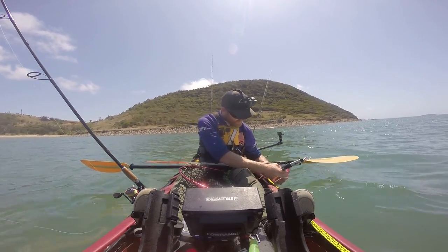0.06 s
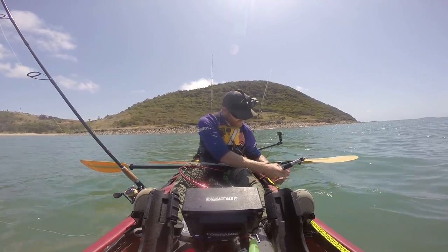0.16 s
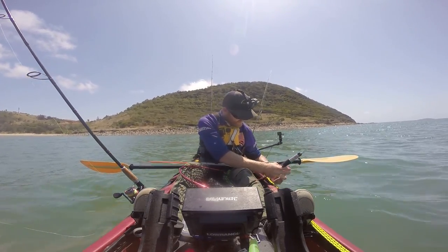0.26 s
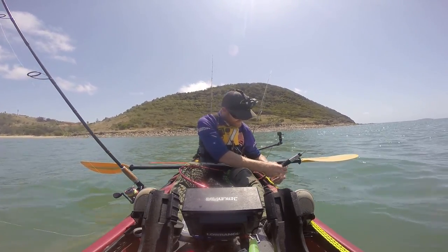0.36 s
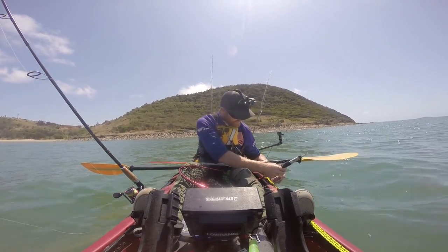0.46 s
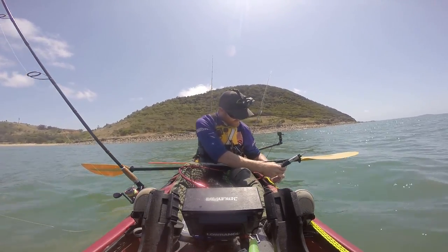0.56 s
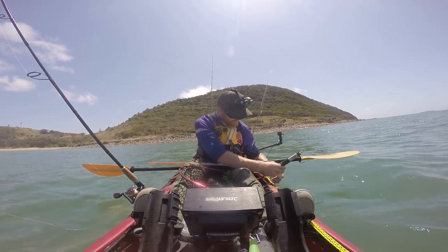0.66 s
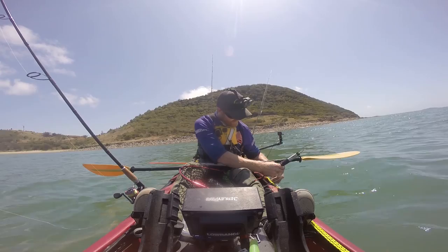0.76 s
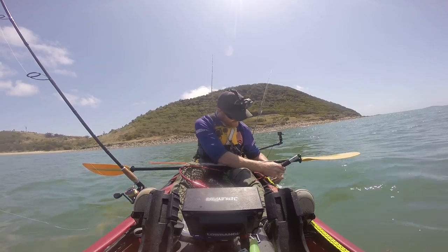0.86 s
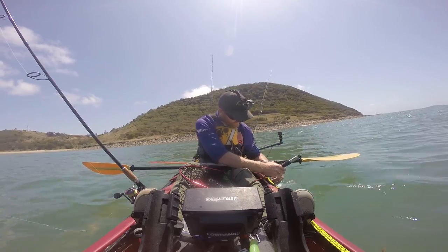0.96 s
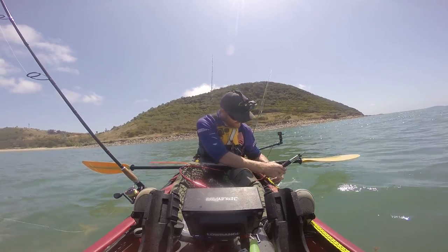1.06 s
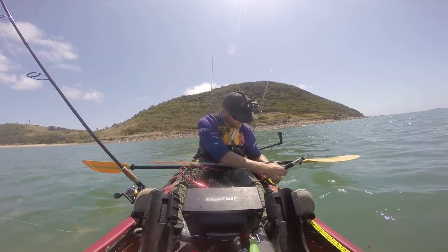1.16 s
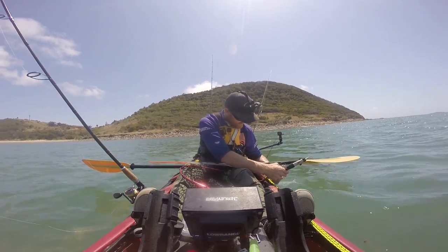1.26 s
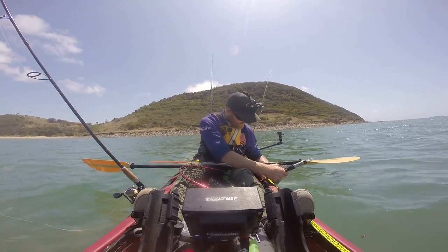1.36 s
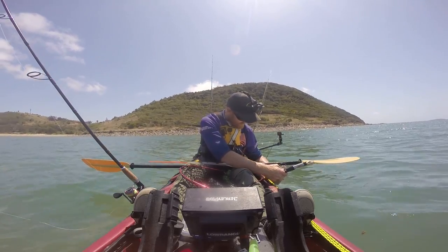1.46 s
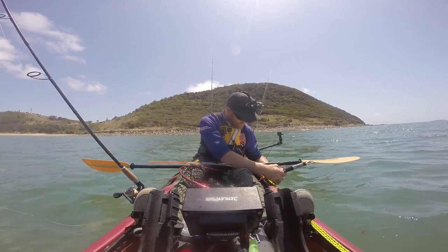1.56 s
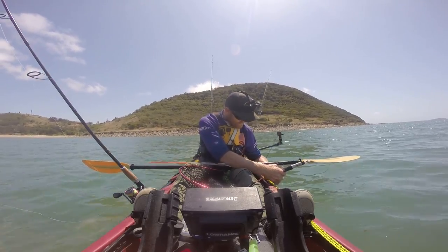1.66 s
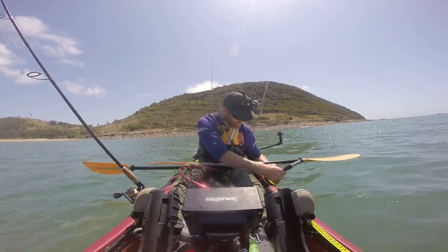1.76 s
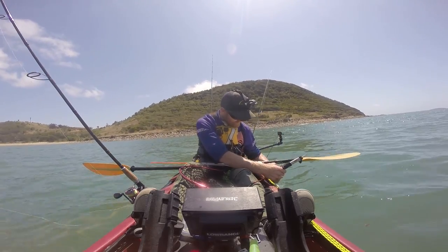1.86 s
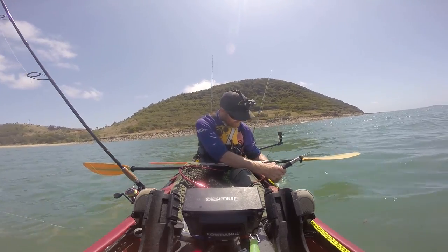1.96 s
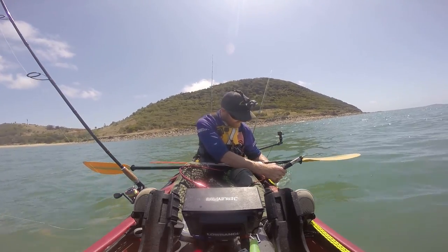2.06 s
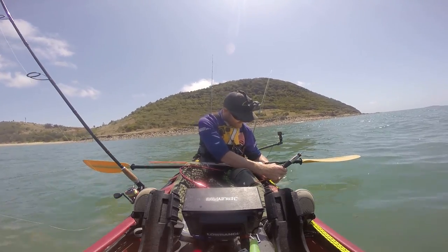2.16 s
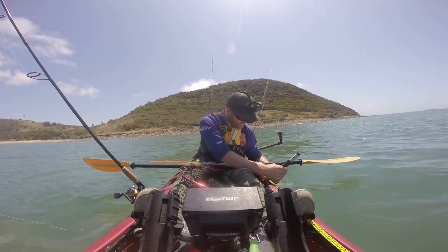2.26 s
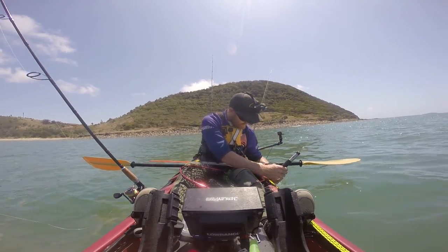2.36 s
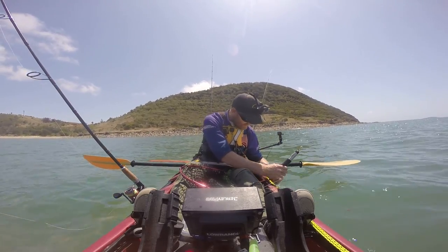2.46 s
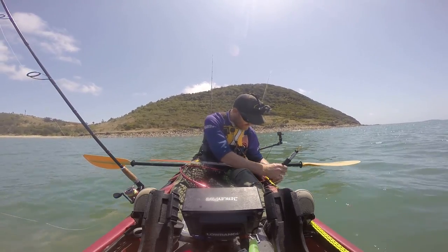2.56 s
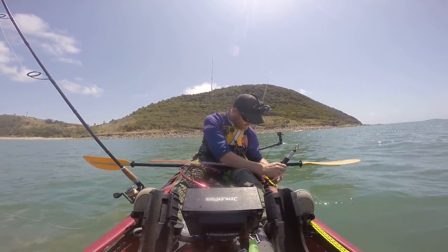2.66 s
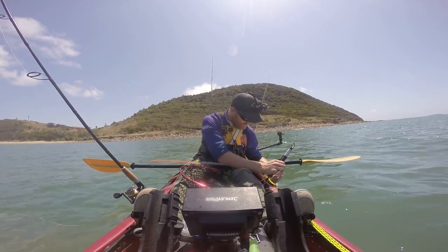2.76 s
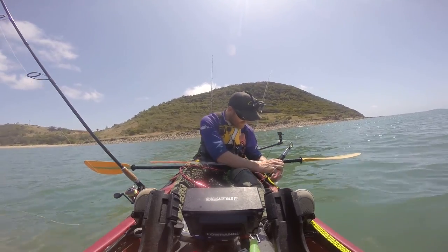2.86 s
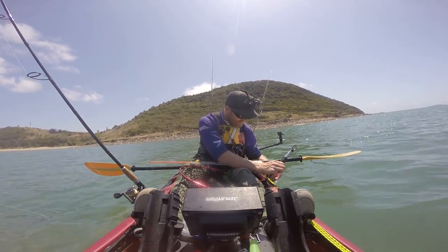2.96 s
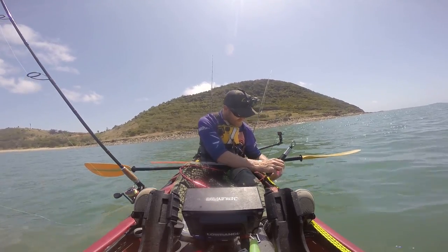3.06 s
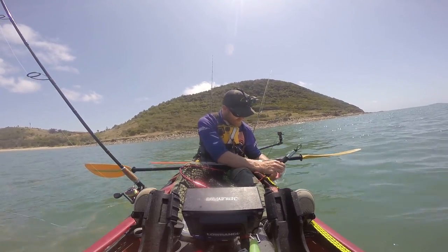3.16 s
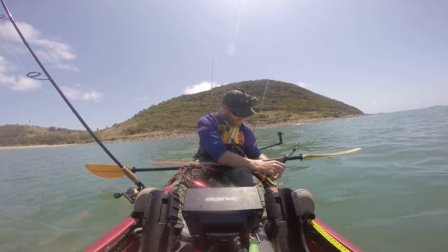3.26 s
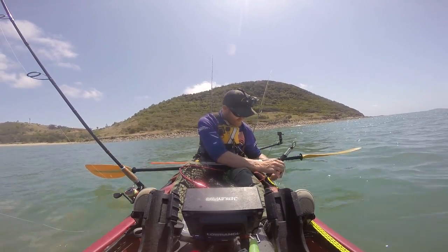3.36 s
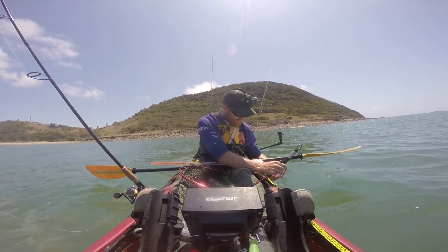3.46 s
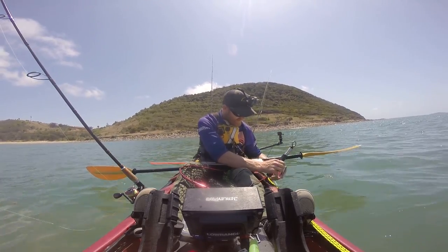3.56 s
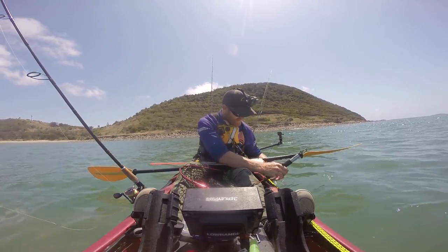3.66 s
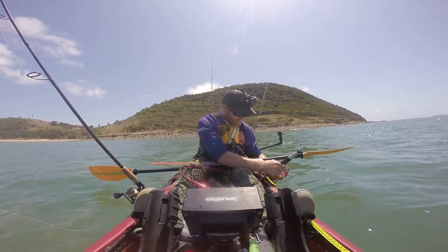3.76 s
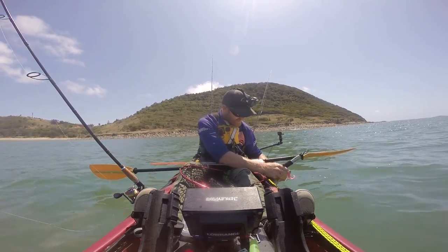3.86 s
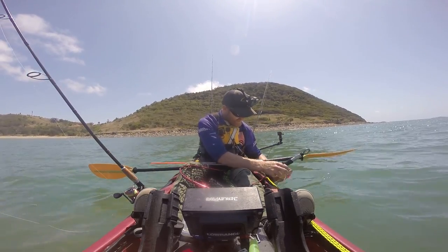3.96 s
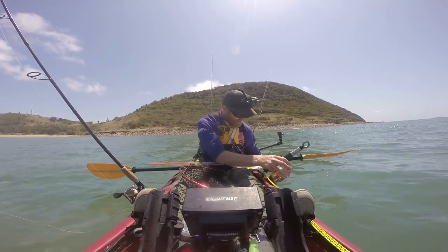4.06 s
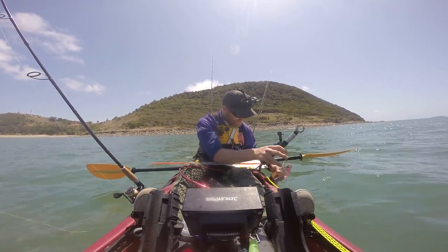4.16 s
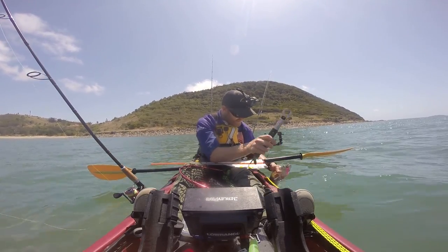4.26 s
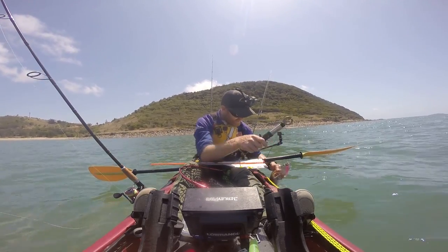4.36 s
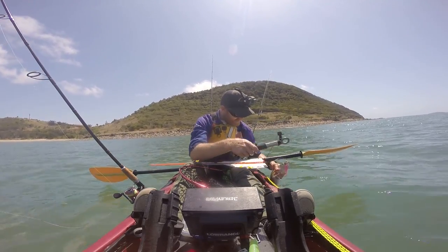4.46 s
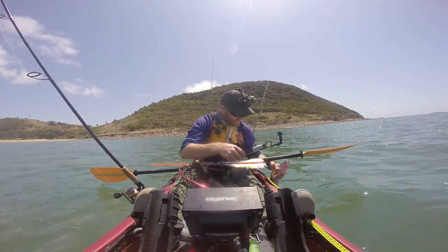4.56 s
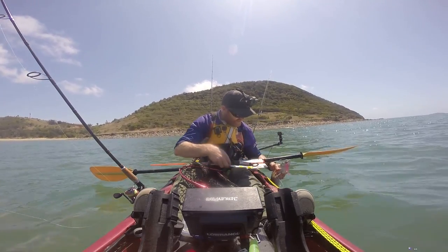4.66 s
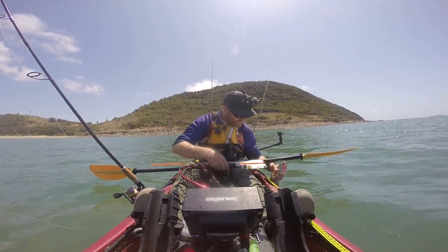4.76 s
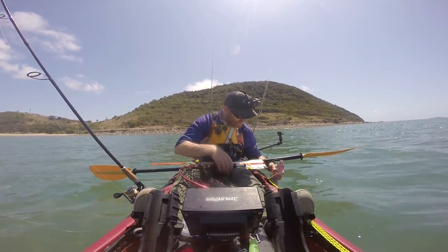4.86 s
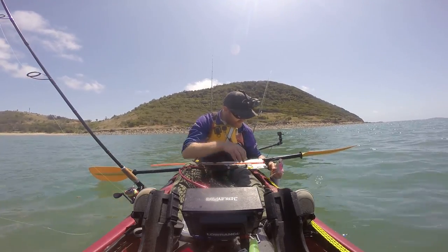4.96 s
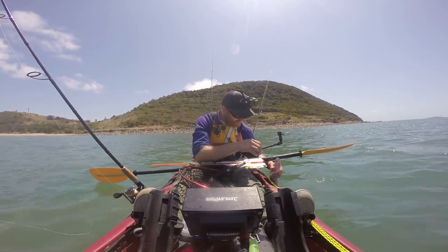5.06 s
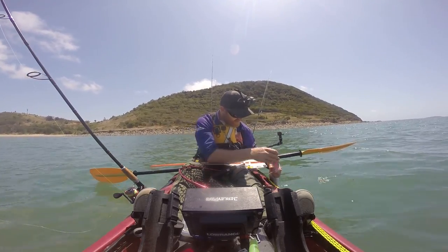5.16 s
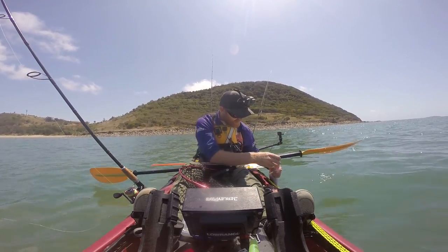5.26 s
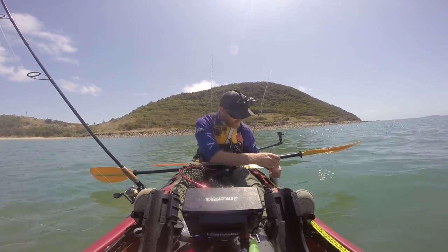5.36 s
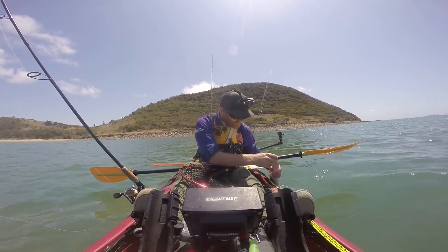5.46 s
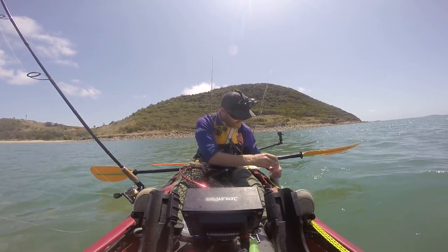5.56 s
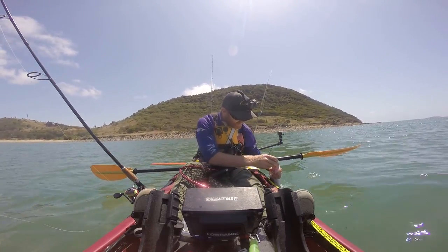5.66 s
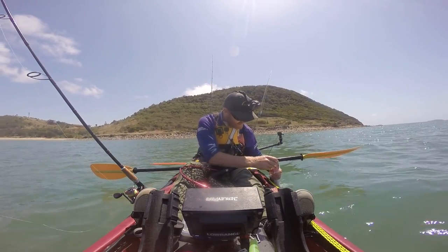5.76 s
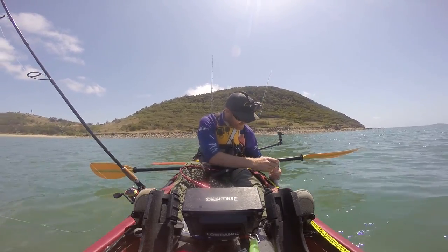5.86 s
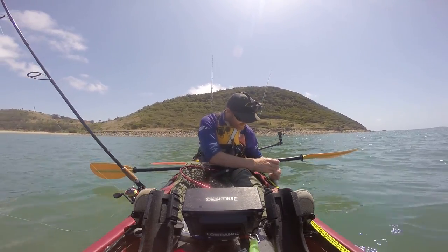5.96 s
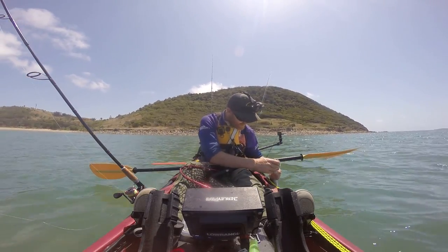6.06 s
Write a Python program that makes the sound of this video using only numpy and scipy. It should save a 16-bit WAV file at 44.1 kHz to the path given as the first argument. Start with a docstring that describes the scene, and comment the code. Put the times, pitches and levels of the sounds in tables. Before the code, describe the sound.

Low water rumble against a drifting hollow kayak, with a hard clunk, a brief reel zip, a short scrape, then boomy knocks and a sharp plastic snap.

```python
"""Water rumbles against a drifting kayak over a camera's faint hiss; drips soon follow, made of short decaying tones.
The camera sits in a sealed case fixed to the deck, so fishing tackle is heard mostly through the plastic hull.
A clunk, a quick reel zip, dull knocks, a short scrape, a sharp snap and a soft rub are built from damped vibrations.
Shaped noise makes the water and hiss; tiny irregular ticks make short patches of faint treble sizzle."""
import sys
import numpy as np
from scipy import signal
from scipy.fft import rfft, irfft, next_fast_len
from scipy.io import wavfile

SR = 44100
rng = np.random.default_rng(int(sys.argv[2]) if len(sys.argv) > 2 else 0)


def put_to_file(sound):
    """Save the sound as 16-bit audio at rate SR, in the file named by the first command-line argument."""
    columns = np.atleast_2d(sound).T  # one column per channel
    safe = np.clip(columns, -1, 1)
    whole_steps = np.round(safe * 32767)
    wavfile.write(sys.argv[1], SR, whole_steps.astype(np.int16))


N = 269451
T = np.arange(N) / SR  # time of every sample [s]
MS_PER_S = 1000

# Water against the hull, rising as the boat is rocked, before a small lift and lapping: (time [s], level [dB])
WATER_SWELL = [(0.0, -53.5), (0.63, -54.5), (0.7, -46.5), (0.8, -56.5), (1.53, -51), (1.74, -60),
               (1.77, -52.5), (3.9, -56.5), (4.24, -50), (4.27, -57), (4.66, -52), (4.97, -39.5),
               (5.11, -51.5), (5.24, -37), (5.33, -55), (5.5, -50.5), (5.6, -56), (6.11, -52.5)]
# Colour of the water's rumble: (frequency [Hz], relative level [dB])
WATER_COLOUR = [(12, -6), (20, -5), (45, 2.5), (70, -3.5), (100, -7.5), (135, -17), (195, -38),
                (400, -69.5)]
# Colour of the steady resonance of the hollow boat: (frequency [Hz], relative level [dB])
HOLLOW_COLOUR = [(120, -19), (195, -13), (235, -3.5), (280, 3), (335, -13.5), (425, 0.5), (510, -21.5),
                 (800, -19.5), (2500, -42.5)]
HOLLOW_DB = -75.5
# Colour of the camera's hiss: (frequency [Hz], relative level [dB])
HISS_COLOUR = [(300, 4.5), (1000, -5.5), (2200, -3), (3500, -9.5), (6000, -13), (10000, -21.5),
               (15300, -18)]
HISS_DB = -87
# Narrow bands of treble hiss: (centre [Hz], distance to each edge [Hz], level before flicker [dB])
FIZZ_BANDS = [(13700, 670, -85.5), (13600, 310, -86), (14700, 500, -85), (14850, 400, -90)]
FLICKER_DB, FLICKER_RATE_HZ = 6, 50  # depth, and new random levels per second

# Clearest plops and plinks, from drips and small tackle: (time [s], peak level [dB], pitch [Hz])
CLEAR_DRIPS = [(0.499, -74.5, 2355), (0.724, -74.5, 3300), (0.888, -67, 960), (0.904, -73, 2940),
               (0.927, -62, 540), (0.975, -64.5, 1820), (2.292, -65, 528), (2.648, -75, 2060),
               (2.675, -68, 2145), (2.796, -72, 1150), (2.944, -58, 385), (3.094, -72, 1430),
               (3.243, -66, 932), (3.381, -70.5, 2140), (3.778, -62.5, 506), (3.895, -72, 2120),
               (4.145, -68, 2230), (4.674, -61.5, 518), (4.83, -68, 2490), (5.735, -62.5, 512),
               (5.785, -73, 2170), (6.016, -71.5, 1206)]

# Vibrations of hard gear being set down: (frequency [Hz], peak level before bounces [dB], build-up [ms])
CLUNK_MODES = [(1690, -39.5, 2.2), (1529, -36, 2.4), (1301, -35.5, 4), (1150, -43, 2.3), (645, -50.5, 3.6),
               (521, -41.5, 2.6), (345.8, -34, 3.4), (211.3, -33.5, 8.5), (95.44, -40.5, 10)]
# The blow and its bounces: (time after the blow [s], level change [dB])
BOUNCES = [(0, 0.5), (.021, -15), (0.035, -22.5)]
CLUNK_S, CLUNK_LAG_CYCLES = .6605, 3.1  # each vibration starts this many of its cycles late: highest first

# Vibrations of the reel's pawl: (frequency [Hz], peak level before tooth changes [dB], build-up [ms])
PAWL_MODES = [(6250, -50, 1.84), (6570, -55, 1.8), (7580, -53.5, 1.8), (9140, -42.5, 1.36)]
# Metal ringing on, before the ratchet's level change and damping:
# (frequency [Hz], gain at resonance [dB], time to fall 60 dB [s])
PAWL_RINGING = [(6060, -2.5, .13), (8500, 9, .14), (8750, -4, 0.18), (9350, 1, 0.12), (9610, -9, .1)]
# A tug on the line pulls the ratchet over a few teeth, hardest in the middle
RATCHET_S, TOOTH_RATE_HZ, TOOTH_JITTER_S = 1.6592, 201, .0002
TOOTH_DB, TOOTH_ARCH_DB, TOOTH_SCATTER_DB = -10.5, 7.5, 4  # at the ends, extra in the middle, tooth to tooth

# Blows on the boat, before the hull rings: (time [s], thud peak level [dB], thud pitch [Hz],
# clack relative to thud [dB], edge relative to thud [dB])
BLOWS = [(2.094, -44.5, 127, -32, -48), (4.544, -50.5, 146.6, -13, -11), (4.777, -51, 130, -4.5, 2.5),
         (4.789, -40.5, 130, 13.5, -6.5), (4.797, -24, 134.3, -4.5, -10), (4.818, -29.5, 149, -5, -17),
         (4.842, -31.5, 147.7, -7.5, -37), (4.880, -45, 149, -9.5, -44), (4.910, -47, 173.4, 0, -29),
         (4.929, -22, 143.5, -39, -58), (4.969, -29.5, 140.2, -14.5, -43.5), (5.017, -50.5, 122.6, -7, -38),
         (5.095, -52.5, 110, -12, -40.5), (5.160, -19, 146.8, -33.5, -52.5)]
# Hull and its fittings: (frequency [Hz], gain at resonance [dB], time to fall 60 dB [s]); the clunk lowers the gain
HULL_MODES = [(97.5, -0.5, 0.31), (139.6, -1.5, 0.28), (192, -5, 0.057), (273, -6.5, 0.16), (398, 1.5, 0.5),
              (479, -2.5, 0.17), (557, -23.5, .1), (518, -7.5, 0.16), (641, 9, 0.12), (799, 3, 0.04),
              (903, -10.5, .1), (1157, 8, .06), (1287, -3, 0.099), (1310, -3.5, .06), (1578, -5.5, .05)]
# What a firm contact adds: (frequency [Hz], level relative to the clack [dB], build-up [ms])
CLACK_MODES = [(380, 0.5, 2.5), (431, -10.5, 8), (532.5, -1, 6.34)]
# What a hard contact adds: (frequency [Hz], level relative to the edge [dB], build-up [ms])
EDGE_MODES = [(790, -4.5, 3.6), (931, -5, 4), (1111, -4, 4.9), (1450, -26, 3), (2200, -30.5, 3)]
THUD_CYCLES = 1.326  # a thud builds up over this many cycles, so low ones are slow
ANSWER_S, ANSWER_RATIO, ANSWER_DB = .02, 1.412, -8  # the deck answers each thud later, higher and weaker
OVERTONE_RATIO, OVERTONE_DB = 2.2, -14.5  # the deck's second mode, brief

# Short patches of faint treble sizzle: (start [s], length [s], starting level before band and tick changes [dB])
SIZZLE_PATCHES = [(4.139, 0.18, -71), (4.552, 0.17, -70.5), (4.789, .025, -63), (5.791, 0.17, -67.5),
                  (5.996, .1, -71.5)]
# Where the ticks sound: (frequency [Hz], random spread [Hz], level change [dB])
TICK_BANDS = [(7340, 130, -9.5), (10370, 140, -5.5), (11650, 250, -11.5), (14950, 150, -1)]
SIZZLE_RATE_HZ, SIZZLE_SCATTER_DB, SIZZLE_SWELL_MS = 100, 4, 4  # average ticks per second in each band
SIZZLE_FADE_DB = 7.5  # lost over the length of a patch

# Body of the scraping gear: (frequency before detuning [Hz], peak level before slip changes [dB], build-up [ms])
SCRAPE_BODY = [(117, -33.5, 3.4), (404, -32.5, 4.8), (552, -35.5, 5.3)]
# Hard edge of that gear: (frequency before detuning [Hz], peak level before slip and hardness changes [dB],
# build-up [ms])
SCRAPE_EDGE = [(986, -52, 10), (1170, -44, 3.3), (1344, -46, 2.55)]
# Gear judders over the deck at a nearly even rate, its contact growing softer
SCRAPE_S, SLIP_RATE_HZ, SLIP_JITTER_S = 4.147, 100, 0.0013
SLIP_DB, SLIP_ARCH_DB, SLIP_SCATTER_DB = -9, 2, 3  # at the ends, extra in the middle, slip to slip
HARD_START_DB, HARD_LOSS_DB = 6, 22

# A hard plastic clip snaps shut and settles: (time [s], level change [dB])
CLIP_HITS = [(4.8976, -1), (4.901, -8), (4.914, -13), (4.924, -18)]
# Vibrations of the snapping plastic: (frequency before detuning [Hz], peak level before hit changes [dB], build-up [ms])
CLIP_MODES = [(960, -53, 5.2), (1120, -55.5, 3.3), (1506, -50, 2), (1950, -41, 3.1), (2530, -45.5, 3.6),
              (2713, -47.5, 3), (4307, -53, 2.9), (4940, -51.5, 1.2), (5650, -58, 2.1), (6656, -58, 3),
              (8140, -51.5, 1.3), (9330, -49.5, 1.6), (10300, -61, 3), (13100, -49.5, 1.6),
              (13940, -56.5, 2.1)]

# Soft rubbing bumps along the deck: (frequency [Hz], peak level before bump changes [dB], build-up [ms])
RUB_BUMPS = [(119, -55.5, 13), (193, -52, 11.7), (577, -80.5, 11)]
RUB_S, RUB_RATE_HZ, RUB_JITTER_S, RUB_ARCH_DB, RUB_SCATTER_DB = 5.345, 51, 0.0036, 3, 0.5

TOP_HZ = 15350  # the camera's upper limit


def amp(db):
    """Turn decibels into an amplitude multiplier."""
    return 10 ** (np.asarray(db) / 20)


def curve(rows, at):
    """Join rows of (time [s], value) with straight lines."""
    return np.interp(at, *np.transpose(rows))


def add(track, s, sound):
    """Mix a sound into the track, starting at s seconds."""
    start = int(s * SR)
    part = sound[:N - start]
    track[start:start + len(part)] += part


def noise(points):
    """Shape random noise by (frequency [Hz], level [dB]) points, with an overall rms of 1."""
    hz, db = np.transpose(points)
    size = next_fast_len(N, True)
    frequencies = np.maximum(np.fft.rfftfreq(size, 1 / SR), 1)
    shape_db = np.interp(np.log(frequencies), np.log(hz), db, left=-100, right=-100)
    spectrum = rfft(rng.standard_normal(size)) * amp(shape_db)
    shaped = irfft(spectrum, size)[:N]
    return shaped / shaped.std()


def walk(rate_hz):
    """Join rate_hz random levels per second with lines; the spread is a little below 1."""
    knots = rng.standard_normal(N // 100)
    return np.interp(T * rate_hz, np.arange(len(knots)), knots)


def ring(hz, db, swell_ms, steepness=2.17):
    """A heavily damped vibration builds up over swell_ms and dies away."""
    t = T[:SR // 4]
    progress = MS_PER_S * t / swell_ms
    envelope = (progress * np.exp(1 - progress)) ** steepness
    return amp(db) * envelope * np.sin(2 * np.pi * hz * t)


def resonate(x, modes):
    """Keep a vibration and add the ringing it leaves in (frequency, gain, 60 dB fall time) modes."""
    t = T[:SR // 2]
    response = 0
    for hz, db, fall_s in modes:
        decay = np.log(1000) / fall_s
        gain = amp(db) * 2 * decay / SR  # makes db the gain at resonance
        response = response + gain * np.exp(-decay * t) * np.cos(2 * np.pi * hz * t)
    return x + signal.fftconvolve(x, response)[:N]


def rattle(x, decay_s):
    """Loose parts scatter a vibration into a short, dense tail of similar energy."""
    t = T[:SR // 4]
    scatter = rng.standard_normal(len(t)) * t * np.exp(-t / decay_s)
    return signal.fftconvolve(x, scatter / np.linalg.norm(scatter))[:N]


def stroke(start_s, rate_hz, jitter_s, arch_db, scatter_db, count):
    """Nearly even contacts tend to be strongest mid-run: (time [s], level [dB], progress [0-1])."""
    late, loud = rng.standard_normal((count, 2)).T
    progress = np.linspace(0, 1, count)
    times = start_s + np.arange(count) / rate_hz + jitter_s * late
    levels_db = arch_db * np.sin(np.pi * progress) + scatter_db * loud
    return zip(times, levels_db, progress)


def water(rumble_db=.5, lap_db=1, lap_rate_hz=7):
    """Small waves rumble against the hull, whose hollow sounds faintly along."""
    level_db = curve(WATER_SWELL, T) + rumble_db + lap_db * walk(lap_rate_hz)
    rumble = noise(WATER_COLOUR) * amp(level_db)
    hollow = amp(HOLLOW_DB) * noise(HOLLOW_COLOUR)
    return rumble + hollow


def hiss():
    """The camera's thin hiss is shaped noise; above it, narrow treble bands flicker on their own."""
    return amp(HISS_DB) * noise(HISS_COLOUR) + shimmer(FIZZ_BANDS)


def shimmer(bands):
    """Narrow bands of noise each flicker on their own."""
    out = np.zeros(N)
    for hz, width_hz, db in bands:
        band = noise([(hz - width_hz, -20), (hz, 0), (hz + width_hz, -20)])
        out += band * amp(db + FLICKER_DB * walk(FLICKER_RATE_HZ))
    return out


def drips(swell_ms=5.3):
    """Short damped tones make clear plinks among fainter ones and many tiny high ones."""
    out = np.zeros(N)
    for s, db, hz in CLEAR_DRIPS:
        add(out, s, ring(hz, db, swell_ms))
    faint = spray(low_hz=1098, high_hz=3520, db=-79.5, spread_db=6.5, swell_ms=6.4, count=7)
    tiny = spray(low_hz=4080, high_hz=11170, db=-85, spread_db=7.5, swell_ms=4.6, count=64)
    return out + faint + tiny


def spray(low_hz, high_hz, db, spread_db, swell_ms, count):
    """Droplets ring at random moments, pitches and levels, from db up to db + spread_db."""
    out = np.zeros(N)
    for when, pitch, size in rng.random((count, 3)):
        hz = low_hz * (high_hz / low_hz) ** pitch
        add(out, when * T[-1], ring(hz, db + spread_db * size, swell_ms))
    return out


def clunk(rattle_db=-8, hull_db=-13):
    """One hard blow sinks from a click to a thud, bounces and rings the hull."""
    blow = np.zeros(N)
    for after_s, bounce_db in BOUNCES:
        for hz, db, swell_ms in CLUNK_MODES:
            start_s = CLUNK_S + after_s + CLUNK_LAG_CYCLES / hz
            add(blow, start_s, ring(hz, db + bounce_db, swell_ms))
    hull = [(hz, db + hull_db, fall_s) for hz, db, fall_s in HULL_MODES]
    return resonate(blow, hull) + amp(rattle_db) * rattle(blow, decay_s=0.0067)


def ratchet(detune=0.01, ring_db=-2, damping=1.54):
    """The reel's pawl ticks over its teeth and the metal rings on, damped by the hand."""
    ticks = np.zeros(N)
    teeth = stroke(RATCHET_S, TOOTH_RATE_HZ, TOOTH_JITTER_S, TOOTH_ARCH_DB, TOOTH_SCATTER_DB, count=16)
    for s, tooth_db, _ in teeth:
        for hz, db, swell_ms in PAWL_MODES:
            tooth_hz = hz * (1 + detune * rng.standard_normal())  # each tooth differs a little
            add(ticks, s, ring(tooth_hz, db + TOOTH_DB + tooth_db, swell_ms))
    metal = [(hz, db + ring_db, fall_s / damping) for hz, db, fall_s in PAWL_RINGING]
    return resonate(ticks, metal)


def knocks(rattle_db=-13, overtone_swell_ms=4.5, answer_swell_ms=7.5):
    """Blows ring the hull and shake its loose fittings."""
    blows = np.zeros(N)
    for s, db, thud_hz, clack_db, edge_db in BLOWS:
        thud_ms = THUD_CYCLES / thud_hz * MS_PER_S
        add(blows, s, ring(thud_hz, db, thud_ms))
        overtone = ring(thud_hz * OVERTONE_RATIO, db + OVERTONE_DB, overtone_swell_ms)
        add(blows, s + 1 / thud_hz, overtone)  # one thud cycle later
        answer = ring(thud_hz * ANSWER_RATIO, db + ANSWER_DB, answer_swell_ms)
        add(blows, s + ANSWER_S, answer)
        for modes, contact_db in ((CLACK_MODES, clack_db), (EDGE_MODES, edge_db)):
            for hz, mode_db, swell_ms in modes:
                add(blows, s, ring(hz, db + contact_db + mode_db, swell_ms))
    return resonate(blows, HULL_MODES) + amp(rattle_db) * rattle(blows, decay_s=0.015)


def sizzle(count=40):
    """Tiny irregular ticks in a few treble bands make short patches of faint sizzle, each fading."""
    out = np.zeros(N)
    for s, length_s, db in SIZZLE_PATCHES:
        for hz, spread_hz, band_db in TICK_BANDS:
            times = np.cumsum(rng.exponential(size=count)) / SIZZLE_RATE_HZ
            variations = rng.standard_normal((count, 2))
            for after_s, (pitch, size) in zip(times[times < length_s], variations):
                fade_db = SIZZLE_FADE_DB * after_s / length_s
                tick_db = db + band_db + SIZZLE_SCATTER_DB * size - fade_db
                add(out, s + after_s, ring(hz + spread_hz * pitch, tick_db, SIZZLE_SWELL_MS))
    return out


def scrape(detune=0.041, grit_db=-7):
    """Gear sticks and slips on the deck; each slip rings a little differently and grit fills the gaps."""
    out = np.zeros(N)
    slips = stroke(SCRAPE_S, SLIP_RATE_HZ, SLIP_JITTER_S, SLIP_ARCH_DB, SLIP_SCATTER_DB, count=9)
    for s, slip_db, progress in slips:
        hard_db = HARD_START_DB - HARD_LOSS_DB * progress ** 2
        for modes, extra_db in ((SCRAPE_BODY, 0), (SCRAPE_EDGE, hard_db)):
            for hz, db, swell_ms in modes:
                slip_hz = hz * (1 + detune * rng.standard_normal())
                add(out, s, ring(slip_hz, db + SLIP_DB + slip_db + extra_db, swell_ms))
    return out + amp(grit_db) * rattle(out, decay_s=0.0052)


def snap(rattle_db=-6, detune=0.022):
    """Quickly damped plastic vibrations crack brightly, then small bounces ring a little differently."""
    out = np.zeros(N)
    for s, bounce_db in CLIP_HITS:
        for hz, db, swell_ms in CLIP_MODES:
            hit_hz = hz * (1 + detune * rng.standard_normal())
            add(out, s, ring(hit_hz, db + bounce_db, swell_ms))
    return out + amp(rattle_db) * rattle(out, decay_s=.005)


def rub():
    """Something soft makes light, overlapping bumps that merge into a low rub."""
    out = np.zeros(N)
    bumps = stroke(RUB_S, RUB_RATE_HZ, RUB_JITTER_S, RUB_ARCH_DB, RUB_SCATTER_DB, count=9)
    for s, bump_db, _ in bumps:
        for hz, db, swell_ms in RUB_BUMPS:
            add(out, s, ring(hz, db + bump_db, swell_ms))
    return out


def scene():
    """Add every sound together as it reaches the one microphone."""
    background = water() + hiss() + drips()
    handling = clunk() + ratchet() + knocks() + scrape() + snap() + rub()
    return (background + handling + sizzle())[None]


def record(dry):
    """The camera cuts the top with a steep low-pass filter."""
    low_pass = signal.ellip(10, .2, 70, TOP_HZ, fs=SR, output="sos")  # ripple and stopband in dB
    return signal.sosfilt(low_pass, dry)


dry = scene()
out = record(dry)
put_to_file(out)
```